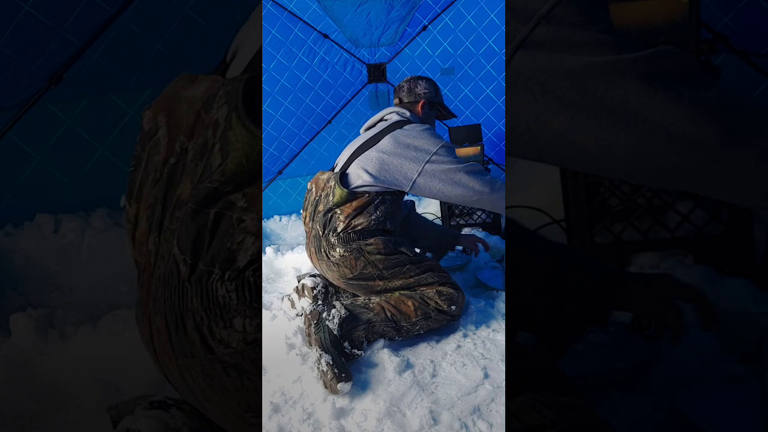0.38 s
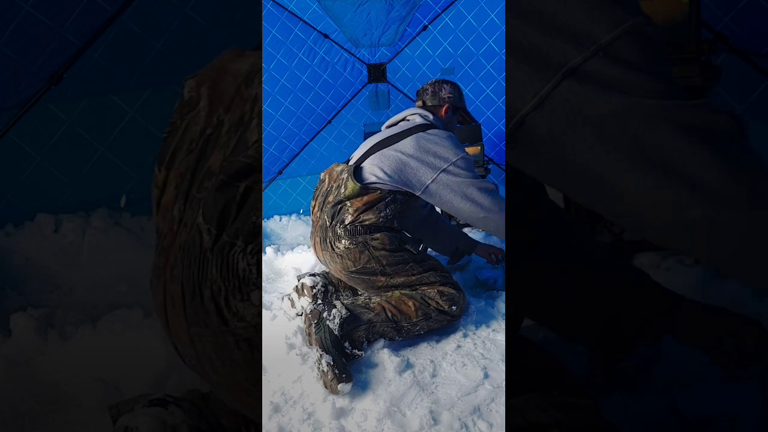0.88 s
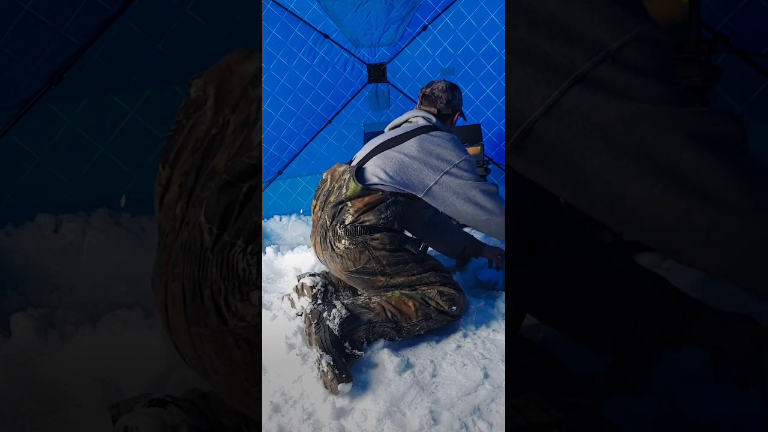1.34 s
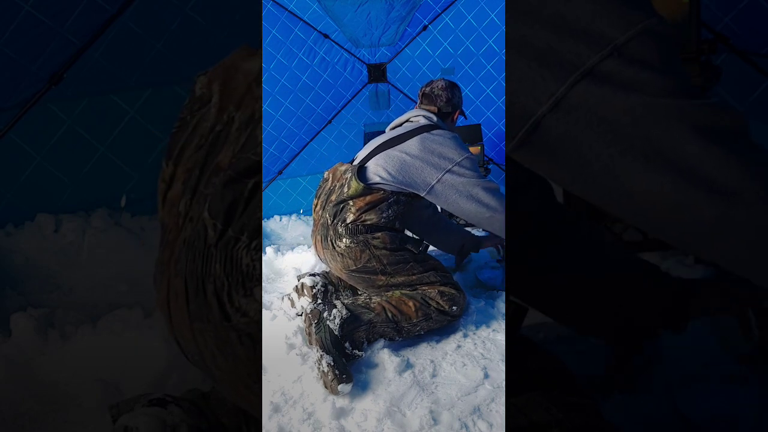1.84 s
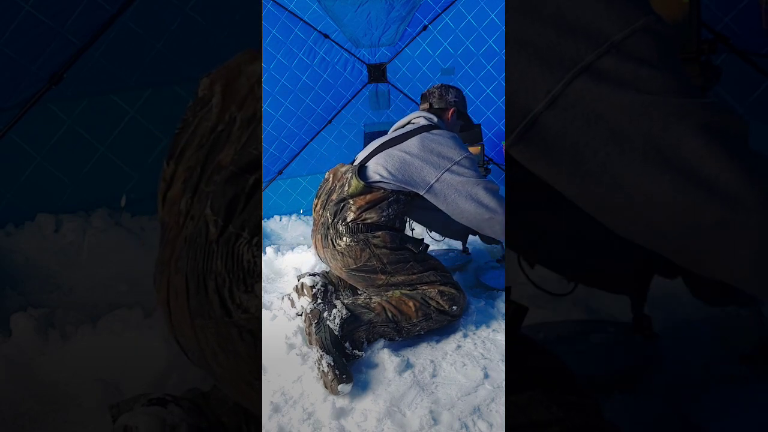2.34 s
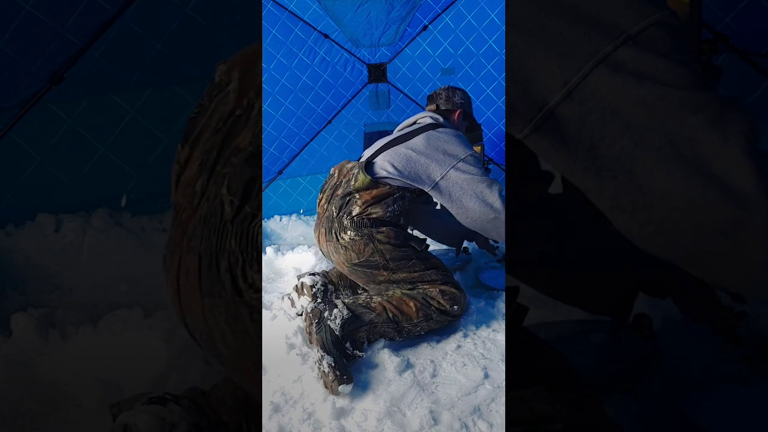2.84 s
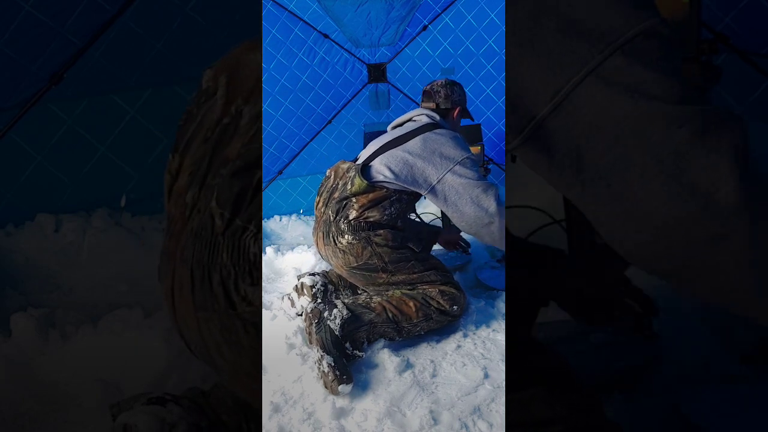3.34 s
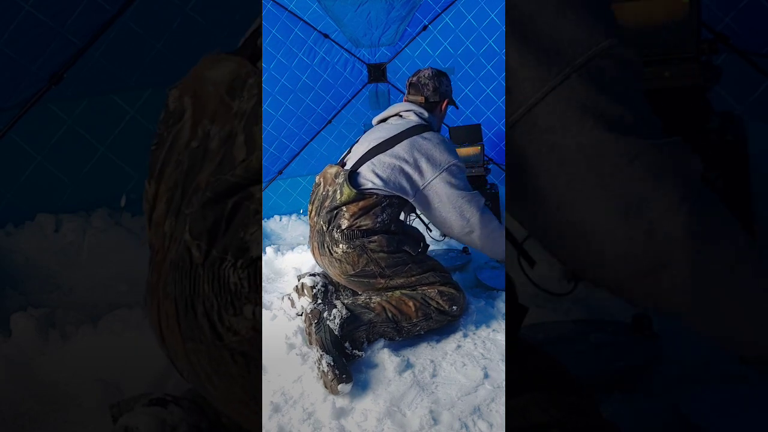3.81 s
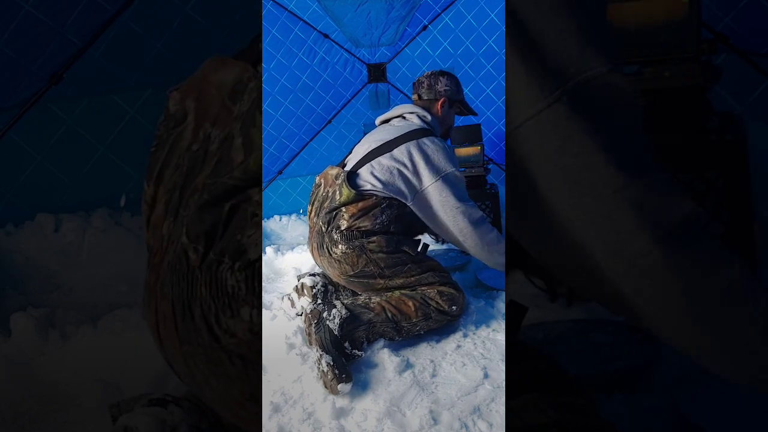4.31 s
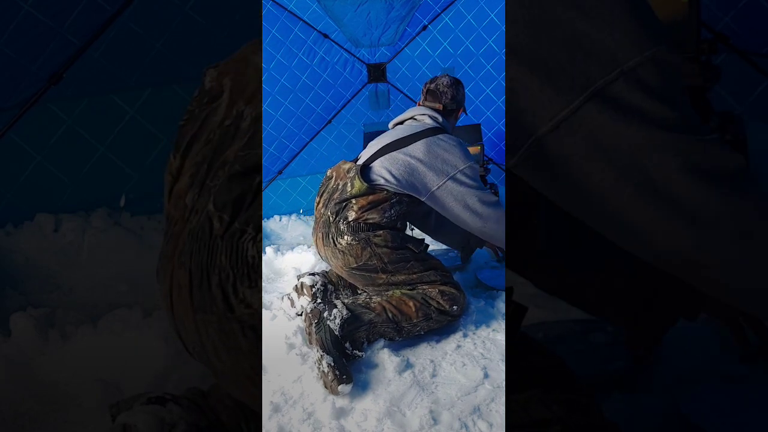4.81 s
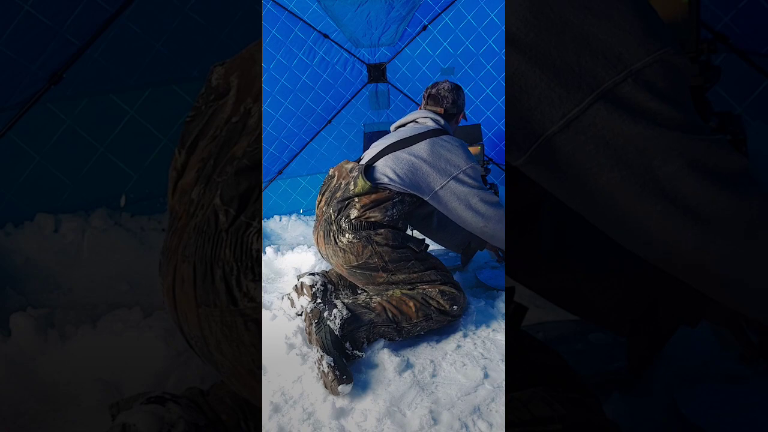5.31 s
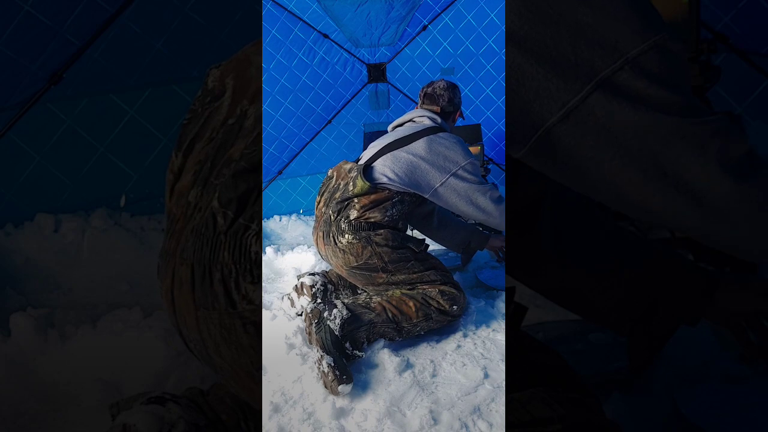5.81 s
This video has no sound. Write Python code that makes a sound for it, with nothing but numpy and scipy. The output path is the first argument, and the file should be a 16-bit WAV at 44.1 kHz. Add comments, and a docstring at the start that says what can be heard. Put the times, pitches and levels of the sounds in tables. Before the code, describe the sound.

Close stereo sound in a small fabric shelter on ice, over a quiet low wind drone with faint sliding whistles. A small slotted bell starts at once, jingling in a few bright, thin strokes until about 0.25 s, then nearly rests. From 0.65 to 1.3 s it rattles in a dense run, each high ring choked by the next pellet blow, with chirps and dry ticks. Sparser, longer rings come between 1.5 and 2.1 s. From 2.45 s the jingling resumes, with a cloth rustle near 2.7 s, and grows busier and louder, peaking at about 3.4-3.85 s, with another rustle around 3.65 s. Then it drops away; wind swells near 4.2 s with low whistles and only tiny tinkles. A soft cloth knock at 5.45 s accompanies the reel ratchet slipping in gritty, uneven clicks over hissing dragged line until 5.9 s. The bell jingles again from 6.03 s to the cut-off end.

```python
"""A small slotted bell on a rod tip jingles as the rod is handled inside a fabric ice-fishing shelter:
a loose pellet strikes the shell, rebounds and chokes the ring at its next landing; the slit chirps.
Late on, the reel ratchet slips through a run of teeth: gritty noise bursts over the hiss of dragged line.
Behind them filtered noise drones as wind, gliding tones whistle faintly, banded noise rustles as cloth."""
import sys
import numpy as np
from scipy import signal
from scipy.fft import rfft, irfft
from scipy.io import wavfile
from scipy.ndimage import uniform_filter1d

SR = 44100
rng = np.random.default_rng(int(sys.argv[2]) if len(sys.argv) > 2 else 0)


def rack_gain(trim_db):
    """Turn a fader trim in dB into the linear factor to multiply a signal by."""
    fader = np.asarray(trim_db, float)
    return 10 ** (fader / 20)


def wrap_up_sound(samples):
    """Save the sound to the file named by the first command line argument, as 16-bit audio."""
    columns = np.atleast_2d(samples).T
    # keep every value between -1 and 1, then stretch to whole-number steps
    tamed = np.clip(columns, -1, 1)
    steps = np.round(tamed * 32767).astype(np.int16)
    wavfile.write(sys.argv[1], SR, steps)


N = 272097
TIME = np.arange(N) / SR


def curve(rows, col=1):
    """A table column interpolated over time."""
    table = np.array(rows)
    return np.interp(TIME, table[:, 0], table[:, col])


def over_hz(points, n):
    """A (hz, value) table at every bin of an n-point spectrum, linear in log frequency."""
    hz = np.maximum(np.arange(n // 2 + 1) * SR / n, 1)
    table = np.array(points)
    return np.interp(np.log(hz), np.log(table[:, 0]), table[:, 1])


def colour(x, points):
    """Filter by a (hz, level_db) spectrum, scaled so that white noise keeps its level."""
    gain = rack_gain(over_hz(points, N))
    return irfft(rfft(x) * gain / np.sqrt(np.mean(gain ** 2)), N)


def spread(x, pan):
    """Two channels with a left-right balance that depends on frequency."""
    half_db = over_hz(pan, N) / 2
    return irfft(rfft(x) * rack_gain(np.array([half_db, -half_db])), N)


def grains(rate_hz, scatter_db):
    """Random clicks of uneven size, rms near 1."""
    hits = rng.random(N) < rate_hz / SR
    x = hits * rng.standard_normal(N) * rack_gain(scatter_db * rng.exponential(1, N))
    return x / np.std(x)


def bursts(start_s, level_db, decay_s):
    """Envelope of sudden starts with exponential tails."""
    impulses = np.zeros(N)
    index = np.minimum((np.array(start_s) * SR).astype(int), N - 1)
    np.add.at(impulses, index, rack_gain(np.array(level_db)))
    return signal.lfilter([1], [1, -np.exp(-1 / (decay_s * SR))], impulses)


# wind spectrum: hz, level_db (relative)
AIR_SPECTRUM = [(25, -9.5), (40, -6.5), (65, 0.5), (110, -5.5), (170, -13.5), (300, -14), (600, -9.5),
                (800, -7.5), (1100, -19), (1800, -31), (2500, -27), (3300, -31), (6500, -44.5),
                (8000, -45.5), (10500, -47.5), (12200, -32.5), (15300, -32.5)]
# likeness of the two sides: hz, correlation (0-1)
AIR_LIKENESS = [(60, 0.97), (130, 0.91), (290, .78), (640, 0.72), (1400, .0), (16000, 0.0019)]
# wind balance: hz, left_minus_right_db
AIR_BALANCE = [(60, 0), (380, 1.5), (700, -3.5), (1300, 0), (4400, -2.5), (8000, 5), (15000, -2)]
# drone swell about its median: time_s, level_db
GUSTS = [(0, -57), (2, -59.5), (3.4, -56.5), (4.2, -53), (4.7, -58), (6.17, -59.5)]
AIR_DB = -53.5


def air():
    """Wind drone and hiss: coloured noise, alike left and right in the bass; gusts move the drone band."""
    like = np.clip(over_hz(AIR_LIKENESS, N), 0, 1)
    mid, side = rfft(rng.standard_normal((2, N)))
    shared, apart = mid * np.sqrt(1 + like), side * np.sqrt(1 - like)
    noise = irfft(np.array([shared + apart, shared - apart]) / np.sqrt(2), N)
    noise = rack_gain(AIR_DB) * spread(colour(noise, AIR_SPECTRUM), AIR_BALANCE)
    drone = signal.sosfiltfilt(signal.butter(1, [350, 1200], "band", fs=SR, output="sos"), noise)
    gust_db = curve(GUSTS)
    return noise + (rack_gain(gust_db - np.median(gust_db)) - 1) * drone


# wind tones in a gap: start_s, length_s, first_hz, last_hz, level_db (relative)
WHISTLE_GLIDES = [(0.475, 0.33, 1480, 1217, -65), (1.12, 0.32, 1450, 1207, -62.5),
                  (3.929, 0.11, 805, 747, -61), (4.042, 0.086, 647, 537, -54.5),
                  (4.186, 0.061, 720, 677, -56), (4.24, 0.089, 612, 678.5, -52.5),
                  (4.739, 0.11, 560, 550, -59), (5.226, 0.11, 1312, 1338, -76.5),
                  (3.574, 0.17, 1160, 1130, -64.5), (5.524, 0.23, 1143, 1150, -64.5)]


def whistles():
    """Thin unsteady tones of wind in a gap that hold, slide and hold again, strongest late in the glide."""
    out = np.zeros(N)
    for start_s, length_s, first_hz, last_hz, level_db in WHISTLE_GLIDES:
        u = np.clip((TIME - start_s) / length_s, 0, 1)
        glide = (1 + np.tanh((u - .5) / 0.1645)) / 2
        # the factors 30 and 20 restore unit rms after smoothing
        wobble_hz = 18 * uniform_filter1d(rng.standard_normal(N), 900) * 30
        pitch_hz = first_hz + (last_hz - first_hz) * glide + wobble_hz
        waver_db = 3.8 * uniform_filter1d(rng.standard_normal(N), 400) * 20
        swell = np.sqrt(2) * np.sin(np.pi * u ** 1.6)
        out += swell * rack_gain(level_db + waver_db) * np.sin(2 * np.pi * np.cumsum(pitch_hz) / SR)
    return out * np.array([[1], [1.3]])


# rustles and knocks: middle_s, length_s, level_db, low_hz, high_hz
CLOTH_MOVES = [(0.577, 0.024, -52, 1240, 1610), (0.579, 0.029, -60, 2120, 2870),
               (2.474, 0.019, -59, 150, 1470), (2.724, 0.075, -48.5, 881, 4640),
               (3.65, 0.15, -50, 845, 5190), (2.727, 0.067, -46, 49.7, 850),
               (5.464, 0.081, -57.5, 49.7, 400), (5.465, 0.085, -48, 400, 1115)]


def cloth():
    """Rustles and knocks: short swells of banded noise, partly shared by the two sides."""
    out = np.zeros((2, N))
    for middle_s, length_s, level_db, low_hz, high_hz in CLOTH_MOVES:
        noise = grains(3000, 0.7) + 1.5 * rng.standard_normal((2, N))
        band = signal.sosfilt(signal.butter(3, [low_hz, high_hz], "band", fs=SR, output="sos"), noise)
        swell = np.exp(-(2 * (TIME - middle_s) / length_s) ** 2)
        out += rack_gain(level_db) * band / np.std(band) * swell
    return out


# reflections from ice and fabric, a list for left and one for right: delay_s, level_db
REFLECTIONS = [
    [(.0031, -9), (.0057, -2), (.0112, -7)],
    [(.0024, -9.5), (.0068, -7), (.0131, -3.5)],
]


def shelter(x):
    """A few close reflections, different at each side."""
    out = x.copy()
    for side, echoes in enumerate(REFLECTIONS):
        for delay_s, level_db in echoes:
            delay = int(delay_s * SR)
            out[side, delay:] += rack_gain(level_db) * x[side, :-delay]
    return out


# pawl catching tooth after tooth, sticking at first: time_s, level_db (relative)
TOOTH_SLIPS = [(5.4363, -35.5), (5.4435, -24), (5.491, -27.5), (5.526, -33), (5.533, -34.5), (5.556, -27),
               (5.5862, -30.5), (5.6082, -33), (5.622, -28), (5.6423, -32.5), (5.6654, -29), (5.693, -30),
               (5.7063, -36), (5.747, -31), (5.7644, -31.5), (5.7777, -37), (5.7887, -42), (5.7935, -34),
               (5.8104, -39), (5.819, -25.5), (5.8426, -31.5), (5.873, -29)]
# line dragging off the spool: time_s, level_db (relative)
LINE_DRAG = [(5.4, -96), (5.43, -54.5), (5.5, -57), (5.56, -49), (5.7, -44), (5.85, -47.5), (5.89, -61),
             (5.93, -84)]
# upper spectrum of the reel: hz, level_db (relative)
REEL_TREBLE_SPECTRUM = [(5600, -32), (7000, -10.5), (7550, -36), (8580, -13), (11100, -12), (12300, -2),
                        (13400, -4.5), (14700, -2), (16000, 0)]
# body spectrum of the reel: hz, level_db (relative)
REEL_BODY_SPECTRUM = [(940, -21), (1600, -38), (1880, -23), (2110, 2.5), (2320, -2), (2560, 8), (2750, -4),
                      (3000, -27.5), (3330, 3.5), (3650, -11.5), (4180, 4.5), (4650, -25), (4900, 0),
                      (5250, 2), (5600, -39), (6610, 0.5), (7800, -60), (10100, -55), (17200, -120)]
# balance of reel and contact noise: hz, left_minus_right_db
CONTACT_BALANCE = [(2000, -2), (4400, -4.5), (8000, 5.5), (12000, 5), (15000, 5.5)]
TOOTH_DECAY_S = 0.0033


def reel():
    """The pawl skips tooth to tooth in gritty bursts over the hiss of dragged line."""
    slip_s, slip_db = np.transpose(TOOTH_SLIPS)
    dragging = (TIME > LINE_DRAG[0][0]) & (TIME < LINE_DRAG[-1][0])
    drag = rack_gain(curve(LINE_DRAG)) * dragging
    grit = np.array([grains(9000, 1.1), grains(9000, 1.53)])
    rough_db = 2.1 * np.repeat(rng.standard_normal(N // 60 + 1), 60)[:N]
    teeth = uniform_filter1d(bursts(slip_s, slip_db, TOOTH_DECAY_S), 50) * rack_gain(rough_db)
    body_growth = np.clip((TIME - 5.42) / 0.12, .35, 1)
    treble = colour(grit * (rack_gain(-1.0) * teeth + rack_gain(3.0) * drag), REEL_TREBLE_SPECTRUM)
    body = colour(grit * (rack_gain(-14.5) * teeth * body_growth + rack_gain(-7.0) * drag), REEL_BODY_SPECTRUM)
    return spread(treble + body, CONTACT_BALANCE)


# contact noise spectrum: hz, level_db (relative)
TICK_SPECTRUM = [(2500, -8), (5500, -12.5), (6600, -12.5), (8000, -41), (11000, -30.5), (12500, -5),
                 (15500, -7)]
TICK_DB = -35


def ticks(rattle):
    """Broad contact noise that follows the rattle."""
    envelope = rack_gain(TICK_DB) * rattle ** 0.98
    return spread(colour(rng.standard_normal((2, N)) * envelope, TICK_SPECTRUM), CONTACT_BALANCE)


CHIRP_LOW_HZ, CHIRP_HIGH_HZ, CHIRP_S = 2750, 4200, .007
SLIT_TOP_HZ = 4350  # the slit speaks little above the main mode


def slit_chirp():
    """A few milliseconds of complex tone that rise towards the main mode."""
    t = np.arange(int(CHIRP_S * SR)) / SR
    pitch_hz = CHIRP_LOW_HZ + (CHIRP_HIGH_HZ - CHIRP_LOW_HZ) * np.sqrt(t / CHIRP_S)
    chirp = np.sin(np.pi * t / CHIRP_S) ** 2 * np.exp(2j * np.pi * np.cumsum(pitch_hz) / SR)
    lowpass = signal.butter(6, SLIT_TOP_HZ, fs=SR, output="sos")
    return signal.sosfilt(lowpass, np.r_[chirp, 0 * chirp])


# shell modes, the last two set blow by blow: mode_hz, level_db (relative), t60_s
SHELL_MODES = [(3980, -18.5, 0.018), (3824, -11, .03), (4139, 6, 0.98), (4205, -9, 0.042), (4300, -22, .04),
               (4458, -15, .15), (9094, 10.5, 0.3), (9662, 10, 0.3)]
# how the swinging bell faces the microphones: time_s, left_minus_right_db, left_lead_rad, slit_db (relative)
BELL_POSE = [(0.06, 1, -2.5, -13.5), (0.3, -10, -2.5, 2.5), (0.7, 1.5, -4.5, -7), (0.95, -5.5, -5, -11),
             (1.2, -0.5, 2, -8), (1.57, 6.5, -2, -5.5), (1.68, 1.5, 0.2, -5), (1.84, 19.5, -0.5, -18),
             (2.02, 12.5, -2.5, -12.5), (2.5, 4, -2.5, -24.5), (2.72, 6, -1, -6), (2.9, 2.5, -2.5, -9),
             (3.3, 0.5, -0.74, -11.5), (3.55, 4, -2, -12), (3.72, 4.5, 1.83, -9), (3.85, 4.5, 1.47, -10.5),
             (4.12, 4, -1.5, -10.5), (6.16, 3.5, -2.5, -23)]
# added level of the last mode below the treble pair, as the bell turns: time_s, level_db
UPPER_MODE_LEVEL = [(0, -7), (1.3, 1), (2.55, -6), (2.62, 7), (2.69, 1), (2.74, 3), (2.88, 4), (2.96, 12),
                    (3.08, 10.5), (3.11, 2), (6.17, 1)]
CHIRP_PAN_DB = -4


def chatter(rattle):
    """Pellet chatter in the rattle: each touch sends a rising slit chirp and nudges the lower modes."""
    shared = grains(340, 0.58) * np.array([[1], [-1]])
    apart = np.array([grains(340, 1.7), grains(300, 0.43)])
    taps = (shared + 1.7 * apart) * rattle ** 0.81
    pan = rack_gain(np.outer([.5, -.5], curve(BELL_POSE) + CHIRP_PAN_DB))
    chirps = signal.fftconvolve(taps, slit_chirp().imag[None], axes=1)[:, :N]
    out = rack_gain(curve(BELL_POSE, col=3) - 34) * pan * chirps
    soft = signal.sosfilt(signal.butter(4, [3700, 4550], "band", fs=SR, output="sos"), taps)
    for mode_hz, level_db, t60_s in SHELL_MODES[:-2]:
        level_db = level_db + curve(UPPER_MODE_LEVEL) * (mode_hz == SHELL_MODES[-3][0])
        r = np.exp(-np.log(1000) / (min(t60_s, .08) * SR))
        poles = [1, -2 * r * np.cos(2 * np.pi * mode_hz / SR), r * r]
        out += rack_gain(level_db - 52) * signal.lfilter([1], poles, soft)
    return out


# pellet blows: start_s, level_db (relative), ring_scale_s, spot (0-1, lower to upper treble mode)
BLOWS = [(0.001, -32.5, 0.23, 0.3), (.075, -40, 0.15, 0.45), (0.1181, -23.5, 0.11, 0.9),
         (0.161, -27, 0.16, 0.7), (0.1853, -26.5, 0.12, .05), (0.227, -36, 0.058, 0.8),
         (0.442, -57, 0.82, 0.3), (0.491, -44.5, 0.059, 0.14), (0.6454, -37.5, 0.098, 0.1),
         (0.7331, -34.5, 0.13, 0.8), (0.793, -21.5, 0.07, 0.97), (0.82, -18.5, 0.064, 1),
         (0.838, -27, 0.073, 0.6), (0.863, -25, 0.043, 0.1), (0.872, -27, 0.21, 0.3),
         (0.918, -31, 0.047, .45), (0.924, -23.5, 0.098, 0.85), (.94, -34, 0.073, 0.5),
         (0.9557, -23.5, 0.088, 0.05), (0.979, -25.5, 0.13, 0.7), (1.005, -36, 0.11, .5),
         (1.05, -23.5, 0.16, 0.26), (1.088, -30, 0.25, 0.1), (1.11, -24, 0.22, 0.2),
         (1.1238, -28, 0.068, 0.16), (1.14, -33, 0.14, 0.13), (1.176, -33.5, 0.085, 0.1),
         (1.224, -34, 0.15, 0.84), (1.279, -38.5, 0.092, 0.1), (1.306, -35, 0.062, 1),
         (1.419, -65, 0.11, .5), (1.481, -51.5, 0.15, .5), (1.5096, -41, 0.14, 0.2),
         (1.559, -31.5, 0.42, 0.53), (1.6625, -26, 0.23, 0.2), (1.742, -46, 0.044, 0.26),
         (1.8208, -35.5, 0.086, 0.04), (1.98, -30.5, 0.51, 0.54), (2.036, -38, 0.11, .63),
         (2.0517, -33, 0.062, 0.27), (2.193, -66, 0.28, 0.7), (2.342, -48.5, 0.047, .75),
         (2.4539, -36.5, 0.31, 0.3), (2.4782, -32, 0.18, 0.86), (2.566, -26.5, 0.06, 0.93),
         (2.583, -30.5, .12, .8), (2.618, -33.5, 0.22, 0.4), (2.678, -29.5, 0.11, .5),
         (2.699, -23, 0.11, 0.6), (2.736, -33, 0.12, 0.7), (2.757, -22, 0.087, 0.8),
         (2.825, -38, 0.15, 0.15), (2.8528, -28, 0.16, 0), (2.9042, -30.5, 0.1, 0.3),
         (2.934, -23.5, 0.037, 0.51), (2.9548, -29.5, 0.21, 0.1), (3.0147, -30, 0.14, 0.8),
         (3.045, -29.5, 0.13, 0.3), (3.096, -25.5, 0.16, 0.2), (3.12, -21.5, 0.13, 0.2),
         (3.2248, -17.5, 0.19, 0.06), (3.266, -21.5, 0.13, 0.35), (3.3255, -25, 0.052, .93),
         (3.349, -23, 0.15, 0.9), (3.412, -25, 0.11, 0.4), (3.427, -15, 0.067, 0.05),
         (3.4421, -22.5, 0.082, 0.14), (3.489, -19.5, 0.14, 0.15), (3.5136, -28.5, 0.081, .16),
         (3.527, -25.5, 0.21, 0.2), (3.5563, -29.5, 0.076, 0.5), (3.582, -18, 0.14, 0.7),
         (3.6411, -28.5, 0.23, 0.3), (3.696, -13, 0.089, 0.69), (3.721, -19, 0.04, .9),
         (3.741, -21.5, 0.052, 0.5), (3.7665, -27.5, 0.51, 0.9), (3.781, -24.5, 0.096, 0.91),
         (3.8068, -29.5, .23, 0.73), (3.828, -14, 0.17, 0.77), (3.864, -30, 0.085, 0.1),
         (4.0133, -57.5, 0.15, 1), (4.099, -38, 0.085, 0.72), (4.16, -49, 0.051, .5),
         (4.3861, -49.5, 0.13, 0.61), (4.435, -57.5, .12, 0.91), (4.4659, -52, 0.085, 0.9),
         (4.549, -62, 0.057, 0.3), (4.936, -57.5, .1, 0.56), (4.978, -60, 0.066, 0.66),
         (5.048, -54.5, 0.056, 0.67), (5.1224, -38, 0.027, 0.04), (5.186, -56, 0.031, 0.8),
         (5.929, -58, 0.077, 0.51), (5.984, -55, 0.056, 0.4), (6.029, -37.5, 0.098, 0.14),
         (6.039, -36.5, 0.34, 0.18), (6.067, -30, 0.11, 0.07), (6.075, -27, 0.13, .1),
         (6.086, -36.5, 0.11, 0.26), (6.137, -22, 0.12, 0.1), (6.153, -20.5, 0.064, .06),
         (6.1605, -24.5, 0.068, .33)]
LIGHT_EVERY_S, RUN_GAP_S, CLEAR_S = .03, .096, .022
LIGHT_DB, LIGHT_SCATTER_DB = -9, 3  # re the weaker neighbouring blow
LIGHT_RING_SCALE_S = 0.17


def landings():
    """The listed blows, with random light landings early in a ring if the next blow is near, in time order."""
    blows = np.array(BLOWS)
    grid_s = np.arange(blows[0, 0], blows[-1, 0] - LIGHT_EVERY_S, LIGHT_EVERY_S)
    chance = rng.random((len(grid_s), 3))
    start_s = grid_s + LIGHT_EVERY_S * chance[:, 0]
    k = np.searchsorted(blows[:, 0], start_s)
    before, after = blows[k - 1], blows[k]
    scatter_db = LIGHT_SCATTER_DB * (2 * chance[:, 1] - 1)
    level_db = np.minimum(before[:, 1], after[:, 1]) + LIGHT_DB + scatter_db
    since_s, until_s = start_s - before[:, 0], after[:, 0] - start_s
    in_ring = since_s < before[:, 2] / 4
    in_run = after[:, 0] - before[:, 0] < RUN_GAP_S
    clear = (since_s > CLEAR_S) & (until_s > CLEAR_S / 2)
    light = np.c_[start_s, level_db, np.full(len(start_s), LIGHT_RING_SCALE_S), chance[:, 2]]
    rows = np.vstack([blows, light[in_ring & in_run & clear]])
    return rows[np.argsort(rows[:, 0])]


RISE_S, CHOKE_S, STRIKE_DB, BOUNCE_DB, SLIT_DB = .008, 0.005, 1, -7, -8.5
# treble pair under a -30.5 dB blow, its fall per dB of harder blow, its scatter
TREBLE_DB, TREBLE_SLOPE, TREBLE_SCATTER_DB = -26, 0.26, 4
SIDE_SCATTER_DB = 4  # the weaker shell modes speak more or less from blow to blow


def strikes():
    """Each blow and its rebound ring the shell until the pellet lands again and chokes the ring."""
    length = 8192
    out, rattle, t = np.zeros((2, N + length)), np.zeros(N + length), np.arange(length) / SR
    mode_hz, mode_db, t60_s = np.transpose(SHELL_MODES)
    modes = len(SHELL_MODES)
    rows, chirp = landings(), slit_chirp()
    slit_db, upper_db = curve(BELL_POSE, col=3), curve(UPPER_MODE_LEVEL)
    pan_db, lead_rad = curve(BELL_POSE), curve(BELL_POSE, col=2)
    side = np.array([[.5], [-.5]])
    low = mode_hz < 8000
    attack = np.sin(np.pi / 2 * np.minimum(t / RISE_S, 1)) ** 2
    chance = rng.standard_normal((len(rows), 2 * modes + 4))
    ends_s = np.r_[rows[1:, 0], N / SR]
    for (start_s, level_db, ring_scale_s, spot), end_s, c in zip(rows, ends_s, chance):
        i = int(start_s * SR)
        treble_db, pan_chance, lead_chance, bounce_chance = c[-4:]
        treble = rack_gain(TREBLE_DB - TREBLE_SLOPE * (level_db + 30.5) + TREBLE_SCATTER_DB * treble_db)
        pair = treble * np.exp(.5j * np.pi * np.clip(spot, 0, 1))
        lower = rack_gain(SIDE_SCATTER_DB * c[modes:-6] * (mode_db[:-2] < 0))
        phase = np.exp(2j * c[modes:-4][::-1])
        gain = rack_gain(mode_db) * np.r_[lower, pair.real, pair.imag] * phase
        gain[-3] *= rack_gain(upper_db[i])
        pitch_hz = mode_hz * (1 + np.where(low, .005, .002) * c[:modes])
        # the ring holds while the pellet flies, then dies as it settles; the treble pair feels it less
        settle = rack_gain(-np.outer(np.where(low, 300, 60), (t / ring_scale_s) ** 2))
        waves = np.exp(np.outer(2j * np.pi * pitch_hz - np.log(1000) / t60_s, t))
        ring = attack * (gain[:, None] * settle * waves).sum(axis=0)
        late = int(SR * 0.0038 * np.exp(0.34 * bounce_chance))
        ring[late:] += rack_gain(BOUNCE_DB) * ring[:-late]
        ring *= rack_gain(level_db + STRIKE_DB) / np.abs(ring).max()
        ring[:len(chirp)] += rack_gain(level_db + SLIT_DB + slit_db[i]) * chirp
        choke = np.exp(-(np.maximum(t - (end_s - start_s), 0) / CHOKE_S) ** 2)
        balance = rack_gain((pan_db[i] + 1.5 * pan_chance) * side)
        facing = balance * np.exp(1j * (lead_rad[i] + .2 * lead_chance) * side)
        out[:, i:i + length] += (ring * choke * facing).imag
        rattle[i:i + length] += rack_gain(level_db) * choke * np.exp(-np.log(1000) * t / (1.3 * ring_scale_s))
    # centred smoothing: the pellet is already skittering just before it strikes
    rattle = uniform_filter1d(rattle, 330) + 0.74 * uniform_filter1d(rattle, 900)
    return out[:, :N], rattle[:N].clip(0)


def scene():
    """Bell and reel in the shelter over cloth and wind."""
    rings, rattle = strikes()
    bell = rings + chatter(rattle)
    return bell + shelter(ticks(rattle) + reel()) + cloth() + whistles() + air()


def band_limit(x):
    """A steep low-pass at the top of the band."""
    return signal.sosfilt(signal.butter(12, 16640, fs=SR, output="sos"), x)


def record(dry):
    """A steep low-pass cuts the mix above 15.6 kHz."""
    lowpass = signal.ellip(8, .2, 70, 15600, fs=SR, output="sos")
    mix = signal.sosfilt(lowpass, dry)
    return band_limit(mix)


dry = scene()
out = record(dry)
wrap_up_sound(out)
```